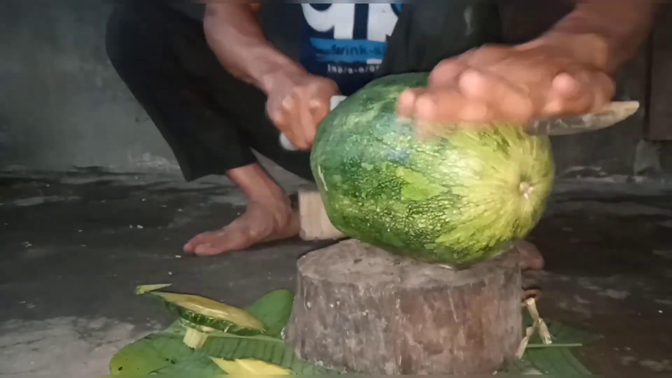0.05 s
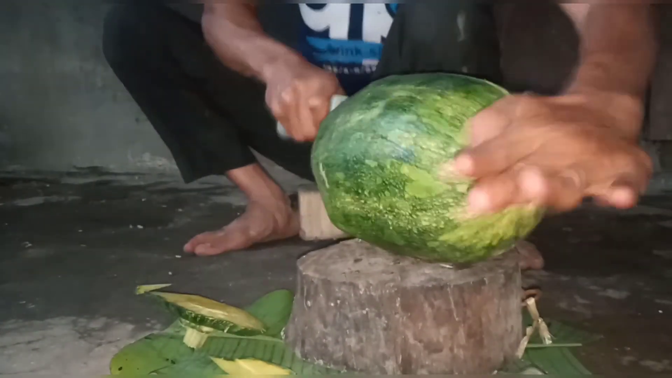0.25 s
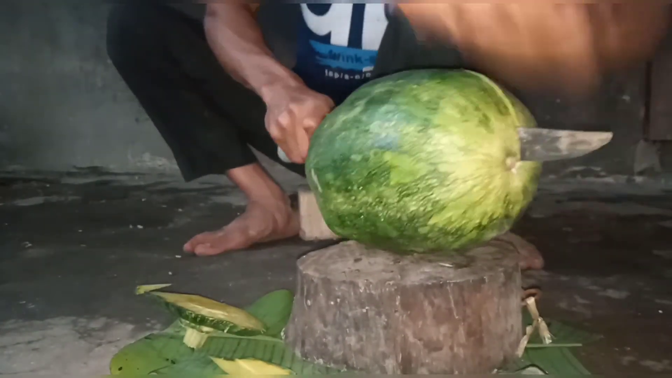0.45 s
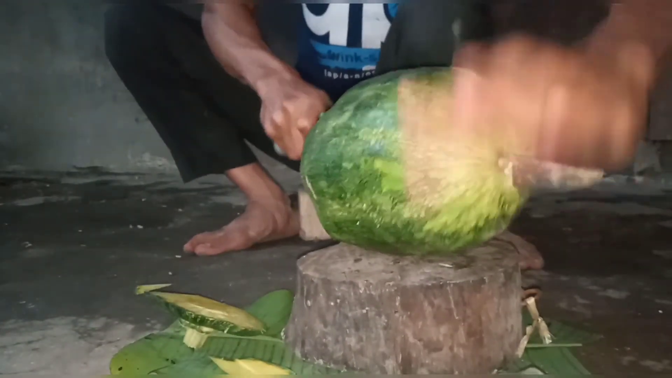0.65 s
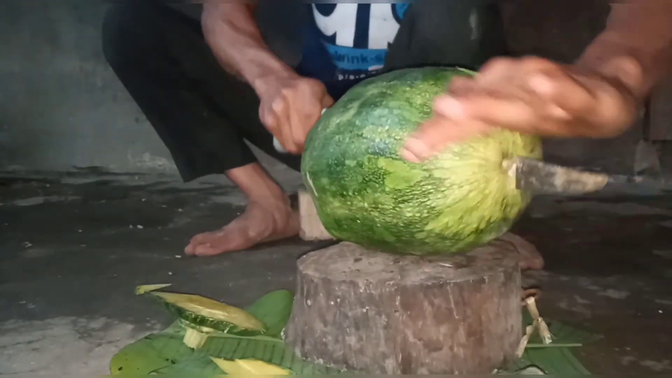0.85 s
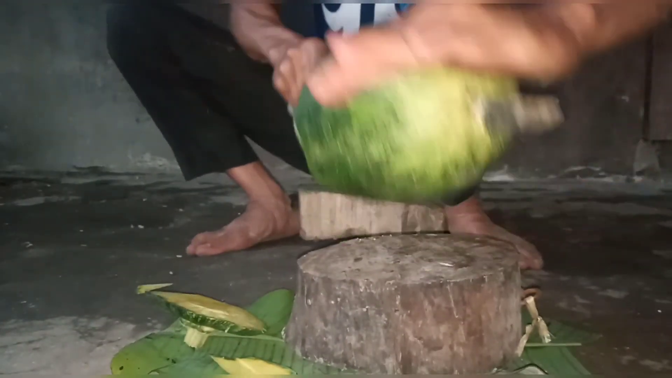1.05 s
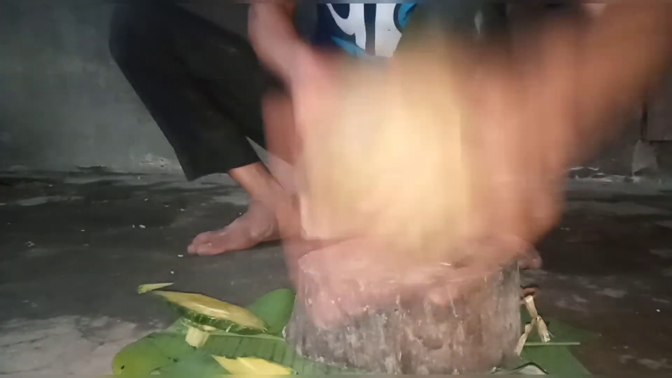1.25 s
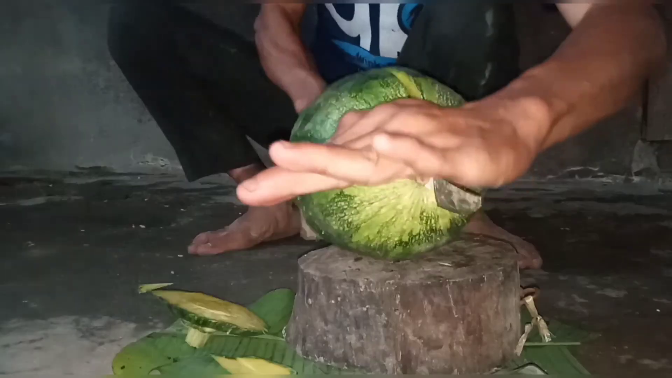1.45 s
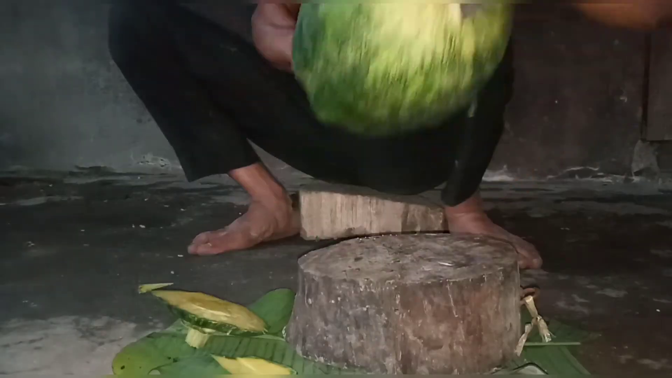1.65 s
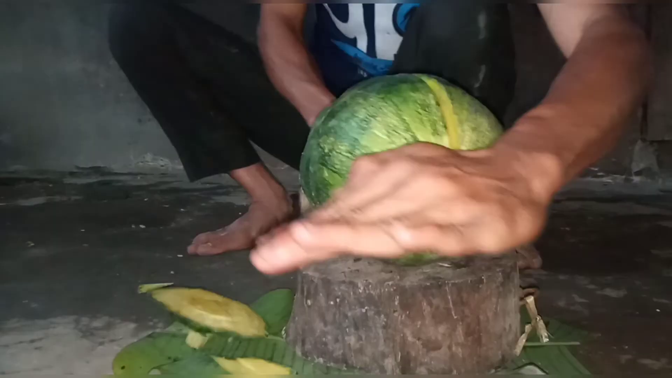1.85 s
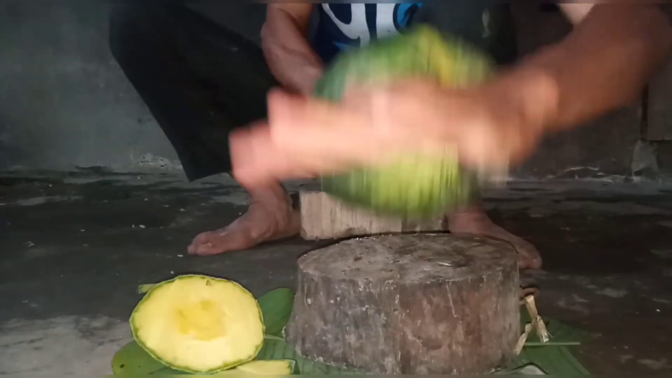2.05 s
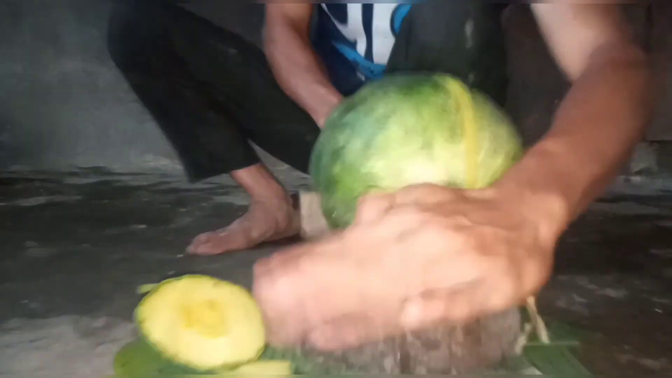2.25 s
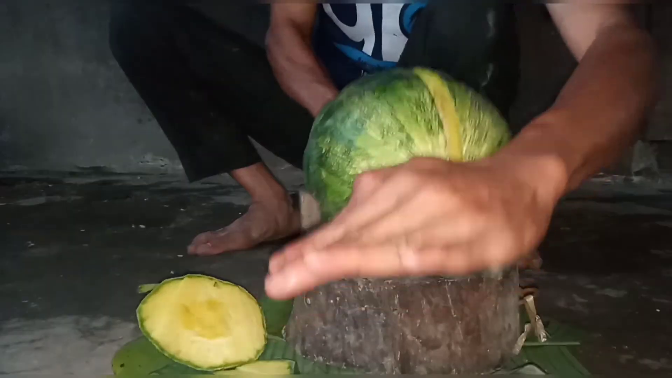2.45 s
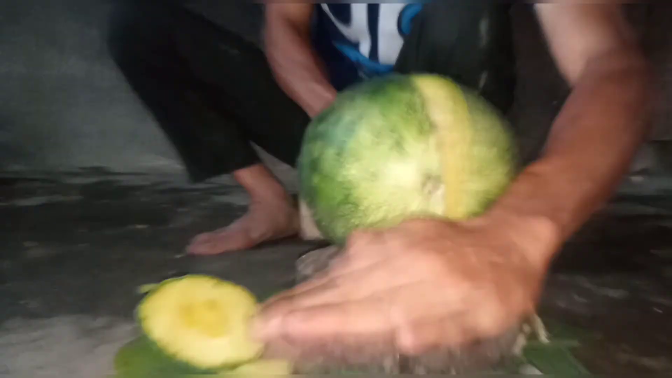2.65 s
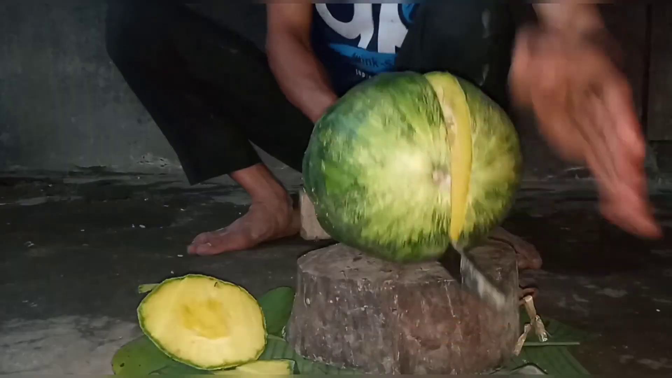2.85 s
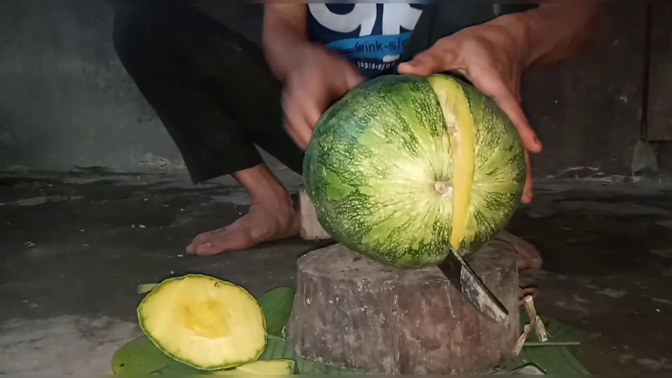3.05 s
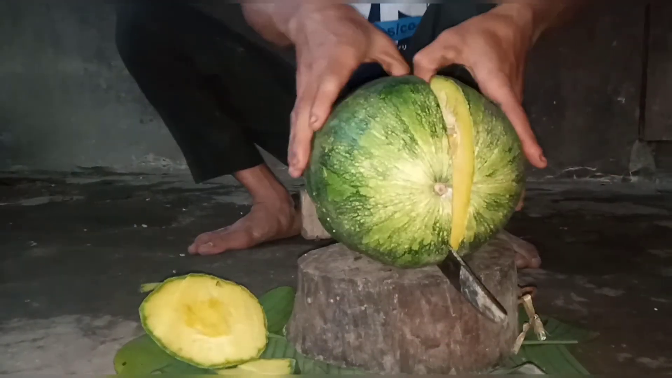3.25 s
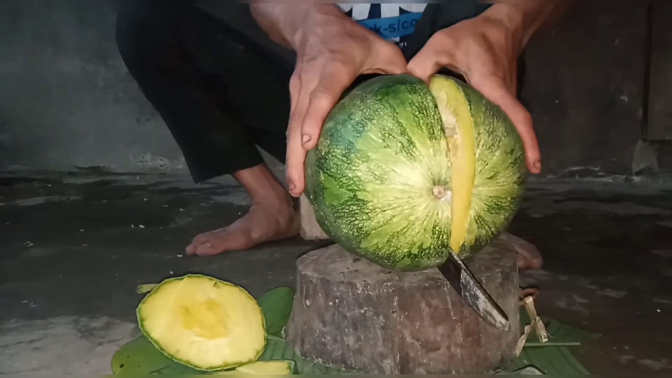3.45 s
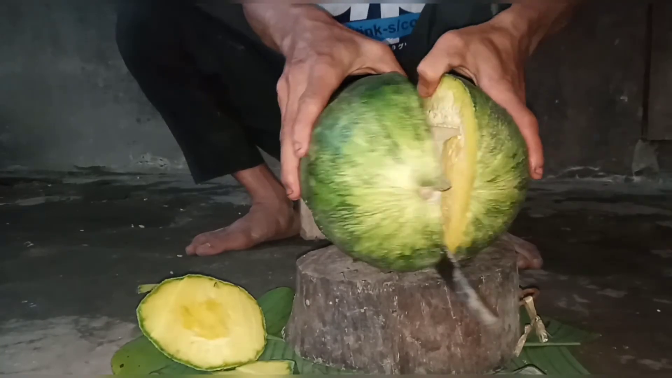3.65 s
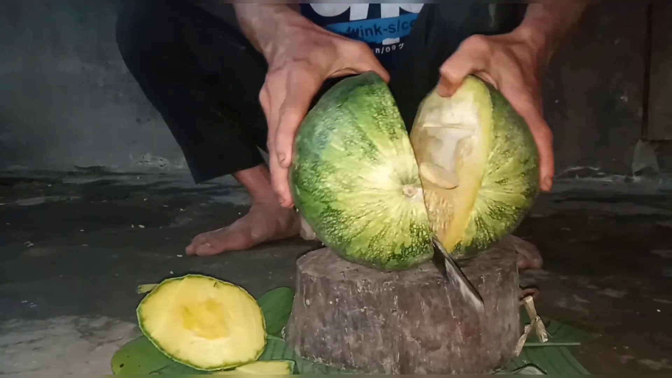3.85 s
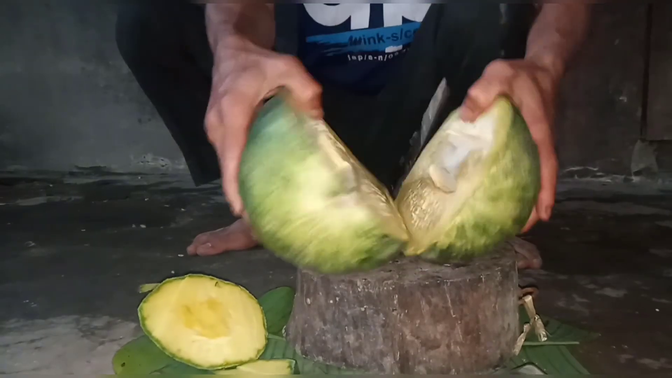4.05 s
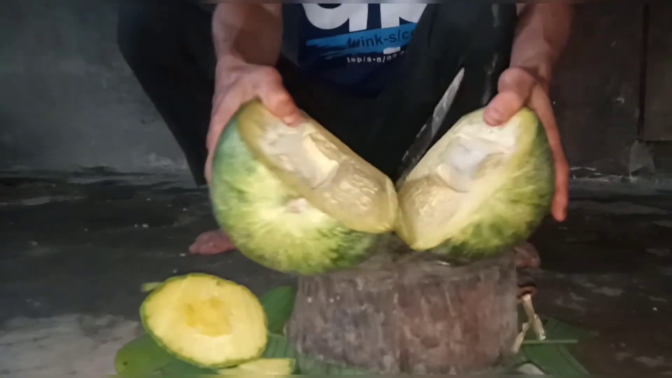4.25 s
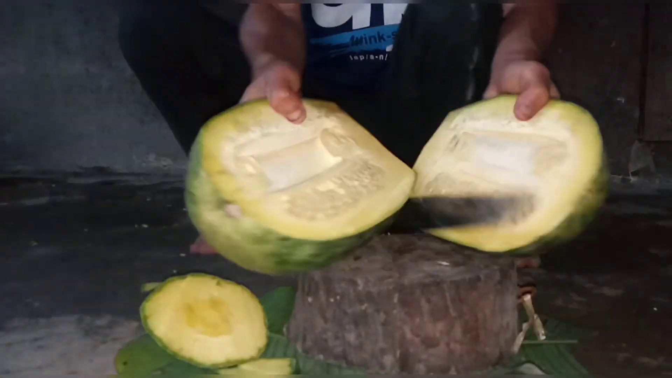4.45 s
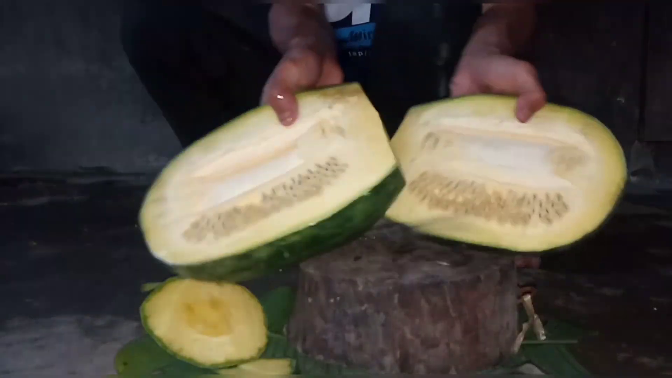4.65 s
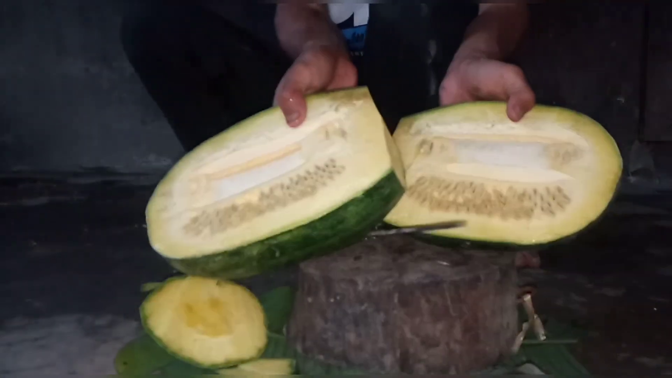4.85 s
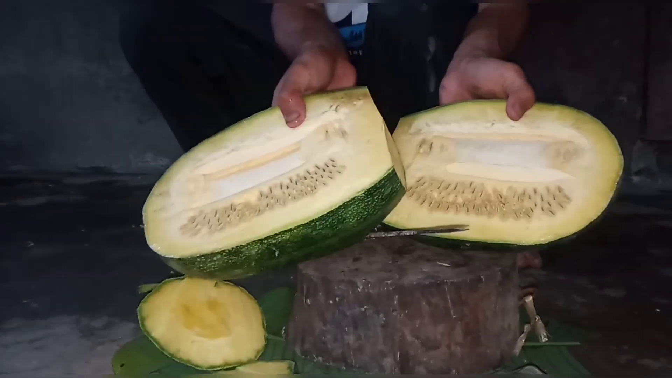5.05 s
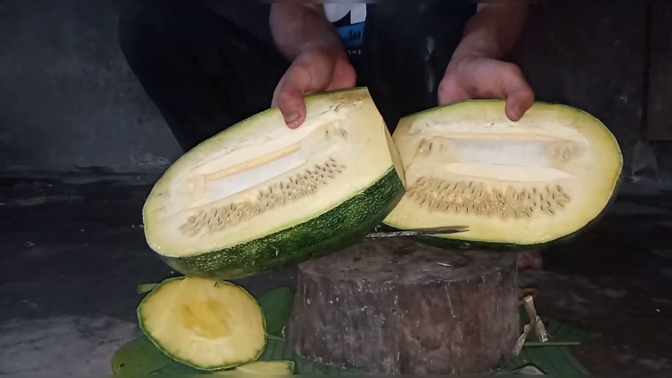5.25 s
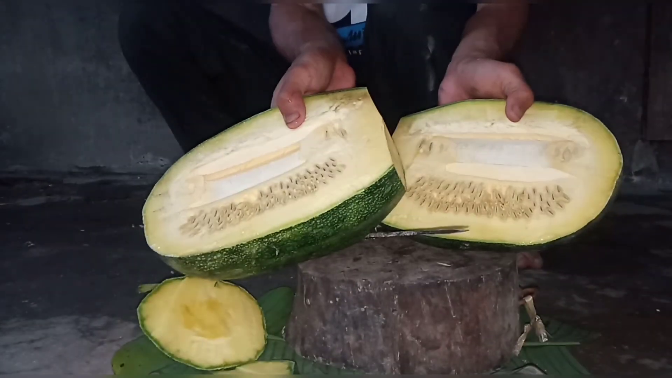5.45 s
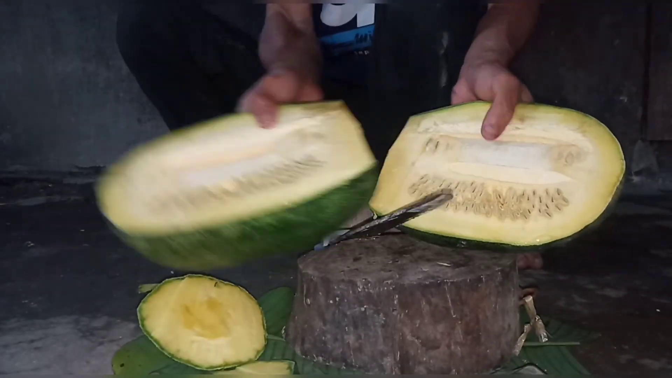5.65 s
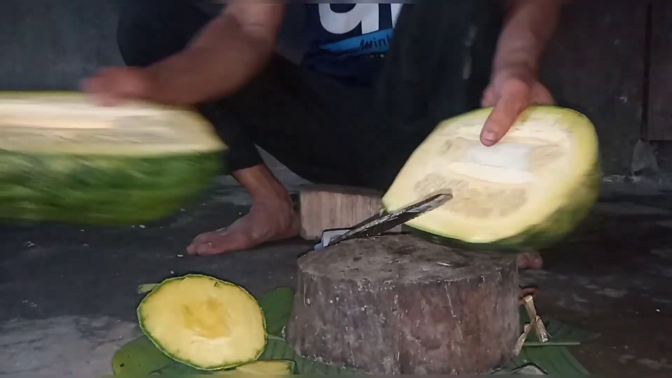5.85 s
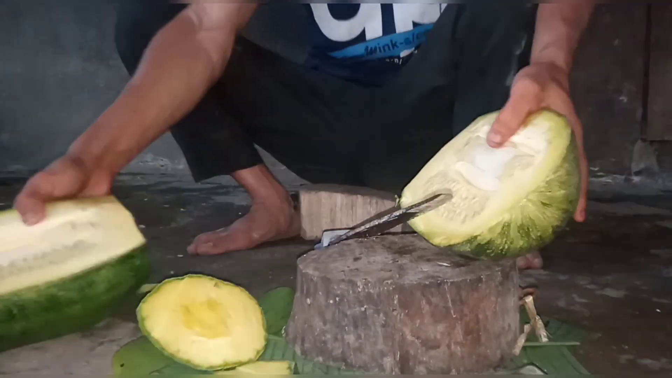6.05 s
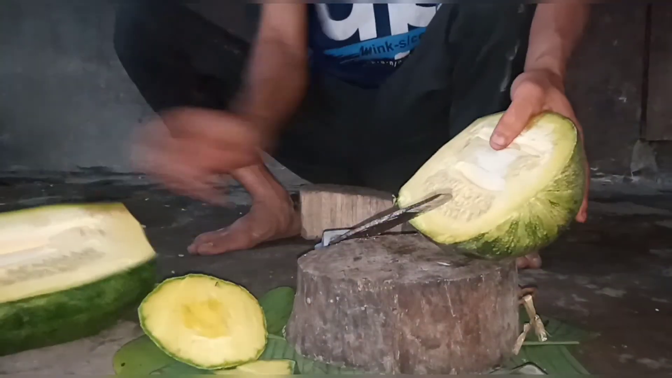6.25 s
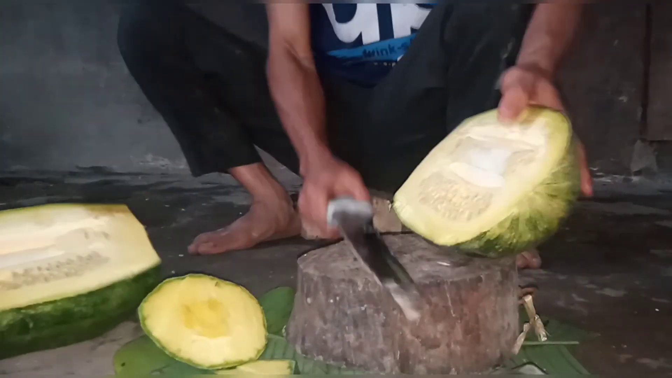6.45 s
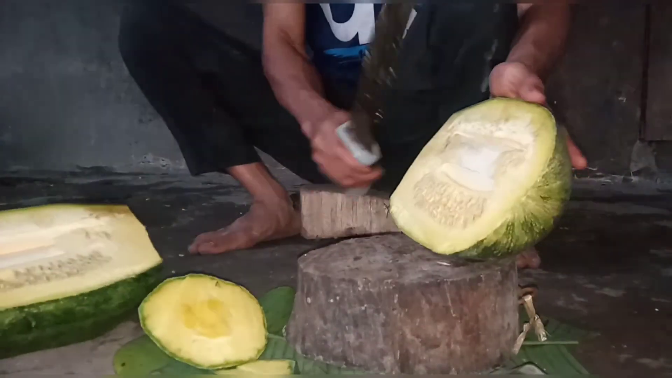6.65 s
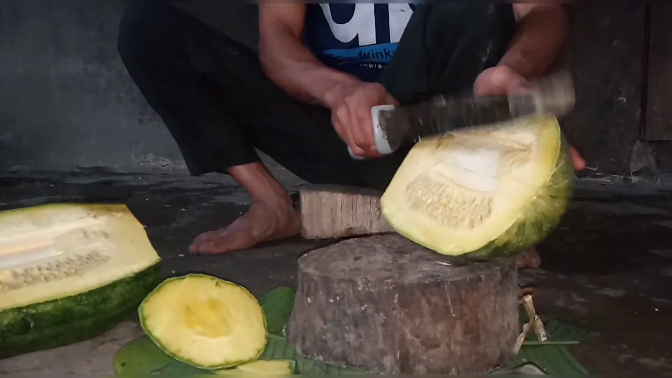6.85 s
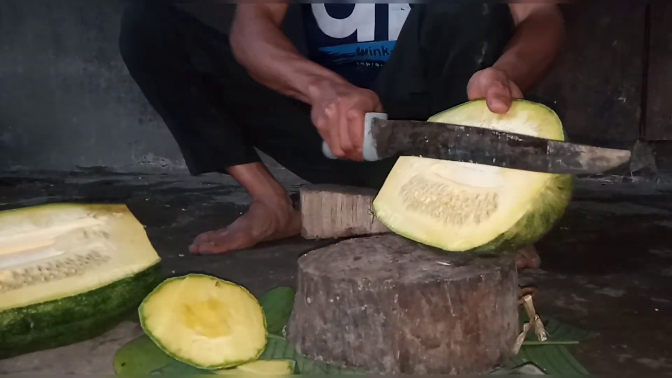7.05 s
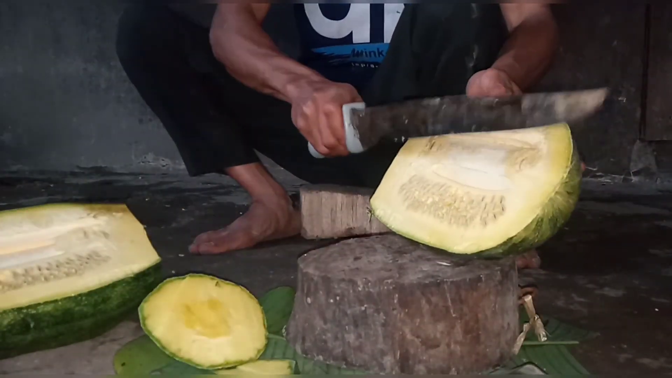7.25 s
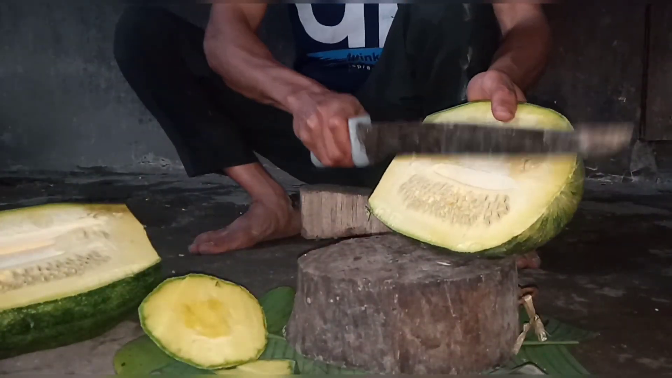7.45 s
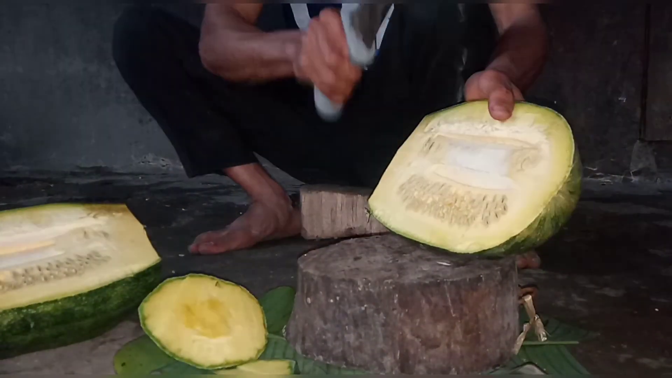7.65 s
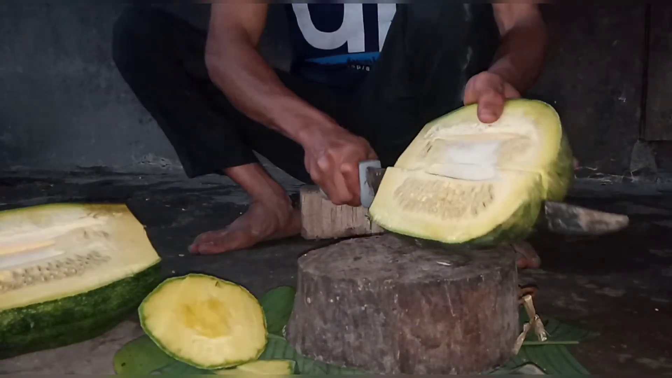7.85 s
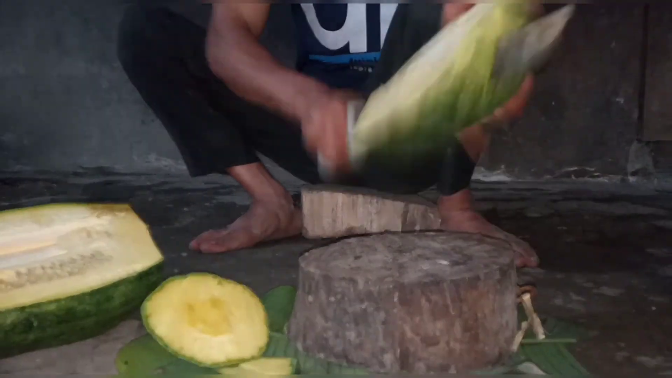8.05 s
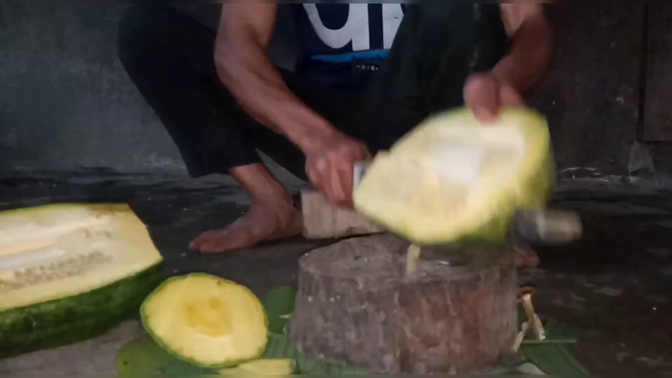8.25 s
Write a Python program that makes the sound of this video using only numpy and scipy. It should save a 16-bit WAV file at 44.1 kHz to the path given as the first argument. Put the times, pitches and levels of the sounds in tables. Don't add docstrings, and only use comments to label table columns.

```python
import sys
import numpy as np
from scipy import signal
from scipy.fft import rfft, irfft
from scipy.io import wavfile
from scipy.ndimage import uniform_filter1d

SR = 44100
rng = np.random.default_rng(int(sys.argv[2]) if len(sys.argv) > 2 else 0)


def convert_level_to_amplitude(level_db):
    exponent = np.asarray(level_db, float) / 20
    return 10 ** exponent


def to_wav(s):
    ch = np.atleast_2d(s).T
    pcm = np.round(np.clip(ch, -1, 1) * 32767)
    wavfile.write(sys.argv[1], SR, pcm.astype(np.int16))


N = 366471
TIME = np.arange(N) / SR


def unit(x):
    return x / np.sqrt(np.mean(x ** 2))


def colour(x, table):
    hz, db = np.transpose(table)
    log_hz = np.log(np.maximum(np.fft.rfftfreq(8192, 1 / SR), 1))
    cepstrum = irfft(np.log(convert_level_to_amplitude(np.interp(log_hz, np.log(hz), db))))
    cepstrum[1:4096] *= 2
    cepstrum[4097:] = 0
    response = irfft(np.exp(rfft(cepstrum)))
    return signal.oaconvolve(x, response)[:len(x)]


def band(x, lo_hz, hi_hz, order=2):
    return signal.sosfilt(signal.butter(order, [lo_hz, hi_hz], "band", fs=SR, output="sos"), x)


def walk(rate):
    hold = int(SR / rate)
    steps = np.repeat(rng.standard_normal(N // hold + 1), hold)
    return 1.6 * uniform_filter1d(uniform_filter1d(steps, hold), hold)[:N]


def add(out, s, x):
    i = int(max(s, 0) * SR)
    out[i:i + len(x)] += x[:N - i]


def ring(hz, t60, push_s, count=16384):
    t = np.arange(count) / SR
    decay = 1000. ** (-t / max(t60, .005))
    onset = 1 - np.exp(-(t / push_s) ** 2)
    return -np.sin(2 * np.pi * hz * t) * decay * onset


# time in seconds, level in dB, drone in Hz.
MOTOR = [(0, -42.5, 112), (.4, -41, 109.5), (.8, -42, 107), (1.32, -43, 115), (1.76, -47, 119),
         (2.24, -46.5, 111), (3.01, -57.5, 110), (3.8, -55, 111), (4.0, -50.5, 114), (4.3, -58.5, 109),
         (4.6, -52.5, 113), (5.0, -59, 107), (5.6, -60, 108), (6.18, -59, 112), (6.69, -67, 112),
         (7.0, -61, 110), (7.4, -61.5, 111), (8.31, -60.5, 115)]
# frequency in Hz, density in dB per Hz.
RUMBLE = [(15, -45.5), (25, -30), (64, -9), (88, -5.5), (108, 5.5), (173, -6.5), (254, -15.5), (300, -16),
          (390, -49.5), (660, -120)]
BODY_DB, BODY_PER_DB, NEAR_DB = -52, 1.52, -42.5


def motor():
    s, level_db, hz = np.transpose(MOTOR)
    drone_db, drone_hz = np.interp(TIME, s, level_db), np.interp(TIME, s, hz)
    phase = 2 * np.pi * np.cumsum(drone_hz * (1 + 0.028 * walk(5.8))) / SR
    drone = np.sin(phase) * convert_level_to_amplitude(1.3 * walk(14))
    rumble = unit(colour(rng.standard_normal(N), RUMBLE + [(400, -80.0)]))
    low = convert_level_to_amplitude(drone_db + 1.5 * walk(4.2)) * (convert_level_to_amplitude(-3.5) * drone + convert_level_to_amplitude(1) * rumble)
    body_db = BODY_DB + BODY_PER_DB * (drone_db - NEAR_DB)
    body = convert_level_to_amplitude(body_db + 2.5 * walk(10)) * unit(band(rng.standard_normal(N), 220, 520))
    return low + body


# time in seconds, level in dB.
BREEZE = [(0, -56), (1.6, -60), (3.6, -57.5), (4.0, -57), (5.5, -55.5), (5.8, -61), (6.2, -54),
          (7.4, -62.5), (8.0, -60)]
# frequency in Hz, density in dB per Hz.
HISS = [(260, -57), (450, -27.5), (540, -9.5), (965, 0), (1040, -4), (1170, -0.5), (1500, 0), (1710, -2.5),
        (3890, -10.5), (5300, -34), (6200, -39), (8460, -45), (15000, -48.5)]


def breeze():
    air = unit(colour(rng.standard_normal(N), HISS))
    edges_hz = 520 * 2 ** (np.arange(9) * .465)
    gust = 1.7 * walk(13)
    hiss = sum(convert_level_to_amplitude(gust + walk(40)) * band(air, lo, hi) for lo, hi in zip(edges_hz, edges_hz[1:]))
    return convert_level_to_amplitude(np.interp(TIME, *np.transpose(BREEZE)) + 4.5) * hiss


def insects():
    return convert_level_to_amplitude(-92 + 2.0 * walk(40)) * unit(band(rng.standard_normal(N), 6080, 6350))


# start and end in seconds, pitch in Hz, first and second partial in dB.
CROWS = [(.7, .95, 745, -68, -68), (3.69, 3.76, 834, -78, -52), (3.79, 3.87, 833, -78, -51),
         (4.15, 4.5, 700, -70, -67), (5.84, 5.95, 832, -80, -54), (6.03, 6.17, 805, -56, -58),
         (6.15, 6.27, 785, -58, -56), (6.26, 6.36, 785, -56, -56), (6.6, 6.7, 616, -61, -67),
         (6.82, 7.03, 625, -59, -65), (7.05, 7.16, 620, -63, -70)]


def crows():
    out = np.zeros(N)
    waver, flutter = 1 + .011 * walk(60), 1 + .25 * walk(45)
    for start, end, hz, low_db, high_db in CROWS:
        span = slice(int(start * SR), int(end * SR))
        phase = 2 * np.pi * np.cumsum(hz * waver[span]) / SR
        swell = np.sqrt(np.abs(np.sin(np.pi * (TIME[span] - start) / (end - start))))
        voice = convert_level_to_amplitude(low_db) * np.sin(phase) + convert_level_to_amplitude(high_db) * np.sin(2 * phase)
        add(out, start, swell * flutter[span] * voice)
    return out


# frequency in Hz, t60 in seconds.
SHED_T60 = [(100, 0.31), (300, 0.22), (1000, 0.27), (3000, 0.25), (8000, 0.32)]
SHED_DB, SHED_DELAY_S = -7.5, 0.014


def echoes():
    t, tail = np.arange(20000) / SR, 0
    hz_points, t60_points = np.transpose(SHED_T60)
    lumps = convert_level_to_amplitude(2.5 * rng.standard_normal(200).repeat(100))
    for hz in 70 * 2. ** np.arange(8):
        t60 = np.interp(np.log(hz), np.log(hz_points), t60_points)
        octave = band(rng.standard_normal(len(t)), hz / np.sqrt(2), hz * np.sqrt(2))
        tail = tail + octave * 1000. ** (-t / t60) / np.sqrt(t60 * SR / 14)
    return tail * lumps * np.clip(t / SHED_DELAY_S, 0, 1) ** 2


PLACES_S = [0, 1.1, 1.6, 2.0, 2.5, 3.0, 4.3, 5.5, 6.3, 7.5, 7.95, 9]


def shed(x):
    out = np.zeros(N)
    for start, end in zip(PLACES_S, PLACES_S[1:]):
        work = x[int(start * SR):int(end * SR)]
        add(out, start, signal.fftconvolve(work, echoes()))
    return convert_level_to_amplitude(SHED_DB) * out


# start in seconds, level in dB, centre in Hz, swell in seconds.
SCUFFS = [(1.198, -41, 1130, 0.029), (1.728, -40.5, 1496, 0.014), (2.069, -42, 1560, 0.0072),
          (2.126, -42, 1196, 0.034), (2.917, -63, 806, 0.012), (3.117, -49.5, 1100, 0.025),
          (3.135, -59, 1032, 0.015), (3.354, -41.5, 832, 0.038), (3.65, -42.5, 925, 0.035),
          (3.705, -43.5, 640, 0.01), (4.019, -49, 697, 0.021), (4.481, -44.5, 1080, 0.044),
          (4.963, -40.5, 1173, 0.02), (5.3, -44, 830, 0.035), (5.333, -44, 1110, 0.028),
          (5.495, -51, 1230, 0.02), (5.802, -49, 1600, 0.021), (5.927, -49.5, 1570, 0.046),
          (6.33, -44, 1200, 0.016), (6.679, -55.5, 1220, 0.02)]


def scuffs():
    out, t = np.zeros(N), np.arange(8192) / SR
    for s, db, hz, swell_s in SCUFFS:
        grains_db = 4.0 * uniform_filter1d(rng.exponential(size=64).repeat(128), 100)
        grit = rng.standard_normal(8192) * convert_level_to_amplitude(grains_db)
        puff = unit(band(grit, 0.62 * hz, 1.22 * hz)) + convert_level_to_amplitude(-17) * unit(band(grit, 1800, 2800))
        age = t / max(swell_s, .005)
        swell = 1.7 * (1 - np.exp(-(2.2 * age) ** 2)) * np.exp(-.9 * age)
        add(out, s, convert_level_to_amplitude(db - 3) * puff * swell)
    return out


# start in seconds, level in dB, wedged in flesh 0 or 1.
CLANKS = [
    (4.611, -24.5, 1),
    (4.649, -19, 1),
    (4.660, -25, 1),
    (6.441, -16, 0),
    (6.453, -19.5, 0),
]
# frequency in Hz, level in dB, t60 in seconds.
BLADE = [(565, -10, .07), (925, -16, .06), (1215, 0, .1), (1300, 0, .05), (1390, 1, .055),
         (2480, -12, .025), (3050, -15, .02), (3700, -17, .02)]
# frequency in Hz, level in dB, t60 in seconds.
WEDGED = [(580, -8, 0.14), (787, -4, 0.058), (1040, -9, 0.055), (1223, -4, .04), (1391, 2, 0.098),
          (1537, 0.5, .04), (2410, -7, 0.025), (3224, -4, .02)]
# free, wedged, in dB.
CLANK_DB = [0.5, -1]
CLANK_SCATTER_DB = 1.5


def clanks():
    out = np.zeros(N)
    for s, db, wedged in CLANKS:
        modes = WEDGED if wedged else BLADE
        luck = rng.standard_normal(len(modes))
        for (hz, mode_db, t60), z in zip(modes, luck):
            level_db = db + CLANK_DB[wedged] + mode_db + CLANK_SCATTER_DB * z
            add(out, s, convert_level_to_amplitude(level_db) * ring(hz, t60, 0.0017))
    return out


# start in seconds, knock in dB, bite in dB above it, sharpness in dB.
CRACKS = [(0.019, -27, -8, -5), (0.161, -35.5, -5.5, -31), (0.237, -40.5, -1, -4), (0.475, -34.5, -8, -15),
          (0.484, -46.5, 11.5, 4.5), (0.668, -60, -13, -13), (1.274, -29, -18, -24), (1.505, -46, -23, -17),
          (1.754, -17, -6.5, -7), (1.764, -16, -4, -13), (2.2205, -13.5, 0, -16), (2.234, -17.5, -1, -19),
          (2.253, -24, 0.5, -15), (2.618, -19, 2.5, -10), (2.626, -19.5, 4, -3)]
# start in seconds, knock in dB, bite in dB above it, sharpness in dB.
SLAPS = [(3.308, -49, 10.5, -9), (3.868, -16.5, 6.5, -4), (3.881, -21, -24, -9), (4.055, -50, -7, -14),
         (4.169, -45.5, -4, -10.5), (4.42, -38, -19, -23), (4.611, -24.5, 3, -15.5), (4.647, -23, 7, -18),
         (4.665, -21, -2, -21), (6.009, -18.5, -9, -26.5), (6.443, -36, 7, -15), (6.452, -25, 4, -16),
         (7.262, -44, -2, -20.5), (7.696, -19.5, -16, -18), (7.911, -54.5, 1.5, -6.5),
         (8.074, -16, 2.5, -11.5)]
# start in seconds, knock in dB, bite in dB above it, sharpness in dB, tearing time in seconds.
TEARS = [(0.0, -26, -7, -17, 0.024), (0.22, -29.5, -4, -13.5, 0.041), (0.484, -35, -9, -20, 0.027),
         (1.256, -14.5, -7.5, -20.5, 0.043), (1.754, -17, -4.5, -15.5, 0.034),
         (2.217, -19.5, -13, -17, 0.031), (3.869, -26, -2.5, -14.5, 0.053),
         (4.651, -16.5, -1.5, -27.5, 0.037), (7.681, -19.5, -1.5, -7.5, 0.022),
         (8.06, -14.5, -8, -16.5, 0.043)]
CRACK_S, SLAP_S, BRUSH_S = 0.012, 0.0068, 0.022
BRUSH_DB = -41
SNAP_FIZZ_DB, SLAP_FIZZ_DB, TEAR_FIZZ_DB = -15.5, -19, -6
FIZZ_PER_DB = 1.6


def snapping(db, bite_db, sharp_db, tear_s, fizz_db):
    t = np.arange(8192) / SR
    noise, size, on = rng.standard_normal(8192), rng.exponential(size=8192), rng.random(8192)
    bursts = (on < .02) * convert_level_to_amplitude(4.5 * size * (db > BRUSH_DB))
    build_up = 1 - np.exp(-(t / (tear_s * tear_s * 1.5)) ** 2)
    fade = np.exp(-t / max(0.53 * tear_s, .0005)) * build_up
    snaps = noise * (0.37 + bursts) * fade
    layers = [(423, 1080, -7.5), (1198, 2277, bite_db - 6.0), (2540, 5540, sharp_db + 3.5),
              (5800, 22000, fizz_db + FIZZ_PER_DB * sharp_db + 13)]
    run = np.zeros(8192)
    for lo_hz, hi_hz, rel_db in layers:
        part = band(snaps, lo_hz, hi_hz, order=4)
        run += convert_level_to_amplitude(db + rel_db + 3.5) * part / np.abs(part).max()
    return run


def cracks():
    out = np.zeros(N)
    for s, *knock in CRACKS:
        add(out, s, snapping(*knock, CRACK_S, SNAP_FIZZ_DB))
    for s, *knock in SLAPS:
        touch_s = SLAP_S if knock[0] > BRUSH_DB else BRUSH_S
        add(out, s, snapping(*knock, touch_s, SLAP_FIZZ_DB))
    for s, *tear in TEARS:
        add(out, s, snapping(*tear, TEAR_FIZZ_DB))
    return out


# start in seconds, level in dB, gourd in Hz, stump in dB above gourd, stump in Hz.
THUDS = [(0.003, -24, 373, 2, 174), (0.219, -25, 514, 3, 161), (0.473, -26.5, 306, -1, 240),
         (1.258, -13, 274, 0, 214), (1.265, -7.5, 347, -5.5, 189), (1.755, -5.5, 416, 2.5, 156.6),
         (1.76, -7, 354, -2.5, 174), (2.219, -1.5, 373.3, -20, 163), (2.617, -2.5, 361.3, -13.5, 175),
         (3.867, -19.5, 347, -28.5, 252), (3.881, -22, 605, -12, 156), (4.055, -27.5, 287, -9, 224),
         (4.424, -32, 321, 1.5, 110), (4.607, -23, 278, -8.5, 238), (5.658, -49, 294, 3, 110),
         (6.009, -15, 352, -1.5, 174), (6.439, -27.5, 545, -7.5, 237), (7.681, -20.5, 345, -13.5, 173),
         (7.695, -26.5, 620, 2, 153), (8.063, -12, 253.5, -7, 203.4), (8.072, -11, 606, -10.5, 239)]
FREE_T60_S, PRESSED_T60_S, PRESS_DB = 0.029, .021, -6.5
SHELL_SCATTER_DB = 2.2


def thuds():
    out = np.zeros(N)
    boom = convert_level_to_amplitude(-22.5) * (ring(42, 0.25, 0.02) + ring(75, .15, 0.018))
    for s, db, gourd_hz, stump_db, stump_hz in THUDS:
        luck = rng.standard_normal(3)
        freedom = 1 / (1 + convert_level_to_amplitude(stump_db - PRESS_DB) ** 2)
        t60 = PRESSED_T60_S + (FREE_T60_S - PRESSED_T60_S) * freedom
        gourd = ring(gourd_hz, t60, 0.0016)
        shell = 0
        for ratio, mode_db, z in zip((.72, 1.4, 1.95), (-13, -4, -5), luck):
            hz = ratio * gourd_hz
            level_db = mode_db + SHELL_SCATTER_DB * z - 14 * (hz / 1000) ** 2
            shell = shell + convert_level_to_amplitude(level_db) * ring(hz, 0.92 * t60, .0015)
        stump = convert_level_to_amplitude(stump_db) * ring(stump_hz, 1.49 * t60, 0.0016)
        add(out, s + .001, convert_level_to_amplitude(db + 8.0) * (gourd + shell + boom + stump))
    return out


# frequency in Hz, gain in dB.
PHONE = [(30, -16), (100, 0.5), (4000, 1), (4800, -13.5), (5500, -19), (6400, -4), (7600, -0.5),
         (9000, -15), (14000, -11.5), (15500, -13), (16100, -44.5)]


def scene():
    outside = motor() + breeze() + insects() + crows()
    close = scuffs() + clanks() + cracks() + thuds()
    return (outside + colour(close + shed(close), PHONE))[None]


def roll_off(x):
    return signal.sosfilt(signal.butter(12, 16110, fs=SR, output="sos"), x)


def record(dry):
    hiss = convert_level_to_amplitude(-90.5) * unit(band(rng.standard_normal(N), 5900, 15600, order=4))
    mix = np.tanh(0.58 * (dry + hiss)) / 0.61
    return roll_off(mix)


dry = scene()
out = record(dry)
to_wav(out)
```